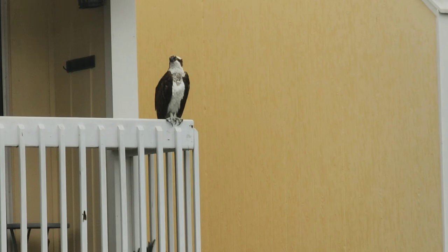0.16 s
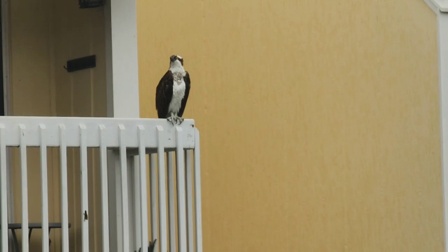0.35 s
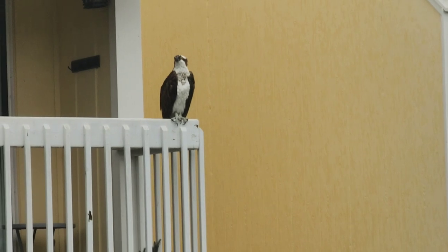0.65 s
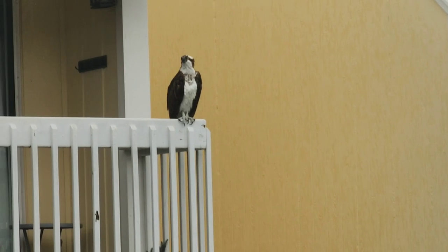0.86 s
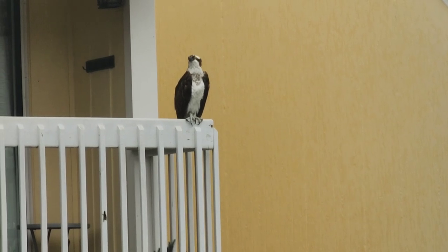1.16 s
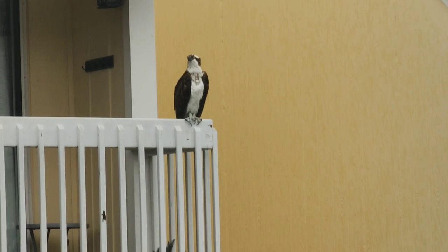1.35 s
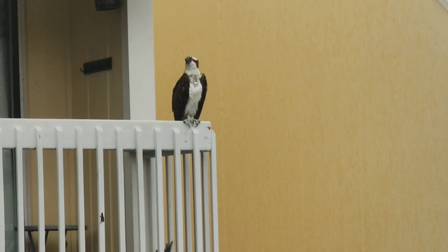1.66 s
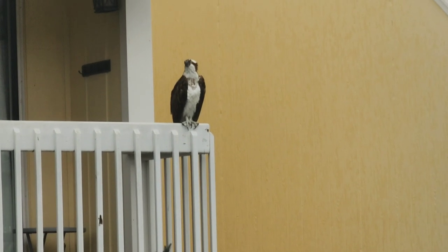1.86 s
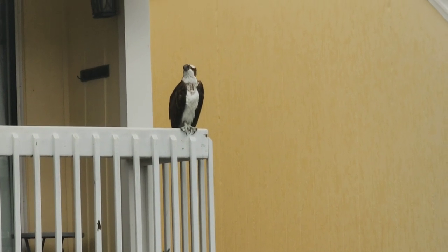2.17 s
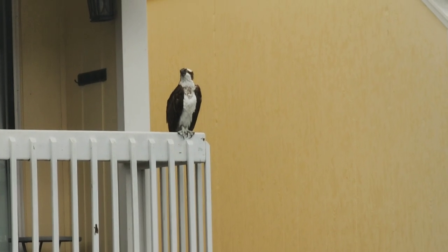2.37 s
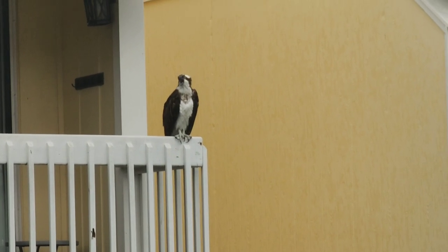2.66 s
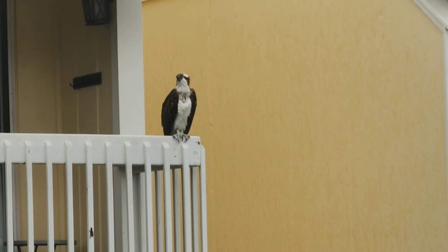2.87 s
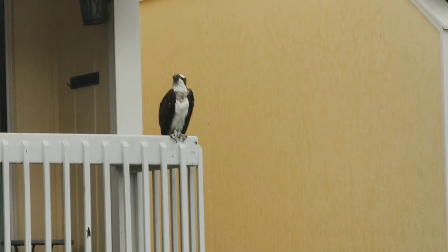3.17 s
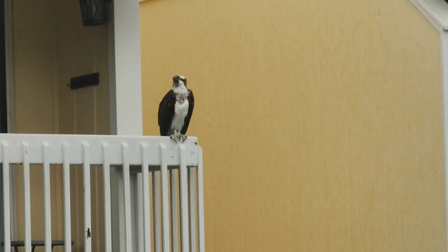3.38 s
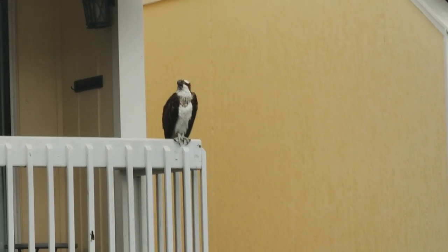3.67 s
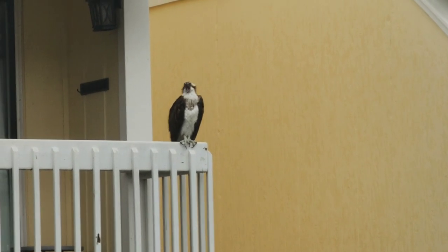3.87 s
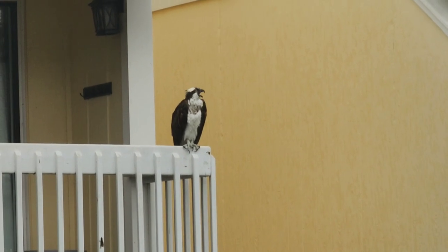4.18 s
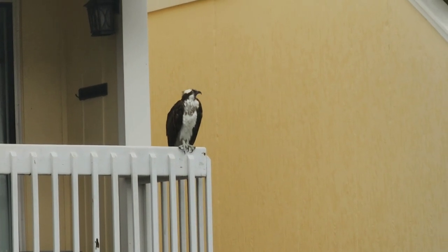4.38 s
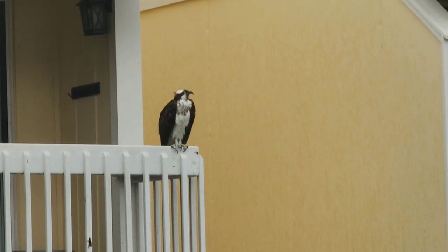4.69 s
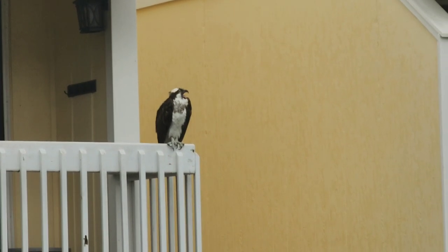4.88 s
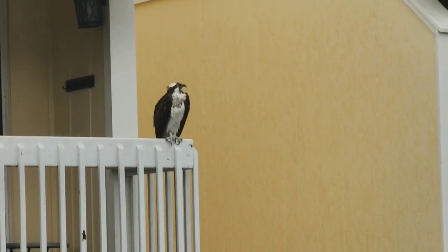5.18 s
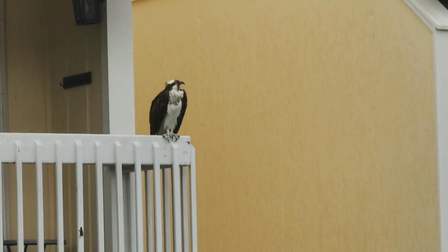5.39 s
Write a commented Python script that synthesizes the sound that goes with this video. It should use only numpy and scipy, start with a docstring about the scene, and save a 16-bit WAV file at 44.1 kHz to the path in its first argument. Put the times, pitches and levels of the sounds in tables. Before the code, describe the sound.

Outdoors among buildings, a distant low rumble and faint hiss run steadily, with a few tiny ticks close to the microphone. An osprey on a balcony rail gives three short, clear whistles, each falling in pitch, and each higher and louder than the last. It then breaks into a quicker, somewhat softer run of harsh screeches and yelps. The walls throw the calls back with a short echo.

```python
"""A far outdoor rumble and a faint hiss come first, with a few small ticks close by.
Then an osprey calls from a balcony rail: three falling whistles, each higher and louder, and a run
of harsh screeches. Air shakes thin membranes in its voice box (the syrinx), whose two sides sound
together in the screeches. The house wall and the buildings around throw the calls back."""
import sys
import numpy as np
from scipy import signal
from scipy.fft import rfft, irfft, next_fast_len
from scipy.io import wavfile
from scipy.ndimage import uniform_filter1d

SR = 44100
rng = np.random.default_rng(int(sys.argv[2]) if len(sys.argv) > 2 else 0)


def dump_mix(stems):
    """Bounce the given channels to the path in sys.argv[1] as a 16-bit WAV at rate SR."""
    frames = np.atleast_2d(stems).T  # one column per channel
    limited = np.clip(frames, -1, 1)  # hard clip at full scale
    pcm = np.round(limited * 32767).astype(np.int16)
    wavfile.write(sys.argv[1], SR, pcm)


N = 244314
TIME = np.arange(N) / SR
PROGRESS = np.linspace(0, 1, 200)  # from the start of a note to its end
NOTE_FLOOR_DB = -25  # how far a swell drops at its two ends
FFT_SIZE = 2 ** 18


def gain_of(db):
    """Turns decibels into a factor to multiply by."""
    return 10 ** (np.asarray(db) / 20)


def unit_level(x):
    """Scales a signal to an average (rms) level of 1."""
    return x / np.sqrt(np.mean(x ** 2) + 1e-20)


def look_up(points, hz):
    """Reads between the rows of a (frequency, value) table, giving each octave equal room."""
    row_hz, value = np.transpose(points)
    return np.interp(np.log(hz + 1), np.log(row_hz + 1), value)


def flutter(rate_hz):
    """Random wavering up to about the given rate."""
    hz = np.fft.rfftfreq(FFT_SIZE, 1 / SR)
    spectrum = rfft(rng.standard_normal(FFT_SIZE)) / (1 + (hz / rate_hz) ** 4)
    return unit_level(irfft(spectrum)[:N])


def blur(grid, rows, columns):
    """Smooths a grid of random numbers into patches."""
    return unit_level(uniform_filter1d(uniform_filter1d(grid, rows, axis=0), columns, axis=1))


def background(level_db=-41.5, patchy_db=1.0):
    """A far rumble, alike in both ears, under a thin, wide hiss."""
    # tone colour of the outdoor air: frequency_hz, relative_level_db
    air = [(15, -23), (40, -13.5), (75, 0), (130, -3.5), (280, -6.5), (470, -14.5), (720, -15.5),
           (1050, -22.5), (1600, -20.5), (2800, -29.5), (4300, -35), (6300, -44.5), (9000, -34.5),
           (12500, -40.5), (16000, -46.5)]
    # how alike the two ears are: frequency_hz, likeness (1 = the same, 0 = unrelated)
    ear_likeness = [(60, 1), (130, 1), (290, 0.84), (640, -0.073), (1410, -0.14), (3100, 0.093),
                    (6820, -0.11), (15000, 0.098)]
    frames, hz = N // 512 + 5, np.fft.rfftfreq(2048, 1 / SR)
    a, b, c, d, patches = rng.standard_normal((frames, len(hz), 5)).T
    alike = np.clip(look_up(ear_likeness, hz), -.985, .985)[:, None]
    left = a + 1j * b
    right = alike * left + np.sqrt(1 - alike ** 2) * (c + 1j * d)
    colour = gain_of(look_up(air, hz)[:, None] + patchy_db * blur(patches, 14, 12))
    sound = signal.istft(np.array([left, right]) * colour, nperseg=2048, noverlap=1536)[1]
    return gain_of(level_db) * unit_level(sound[:, :N])


def ticks(lean_left_db=2):
    """Each tick is a quickly dying puff of noise in one broad band."""
    # small ticks and taps: start_s, level_db, centre_hz, width_octaves, decay_s
    taps = [(.106, -46.5, 12600, 0.44, 0.014), (.597, -58, 11000, 0.64, .012),
            (.746, -44, 11000, 0.25, 0.0057), (1.024, -44, 1400, .6, 0.01), (1.29, -47, 9700, 0.31, 0.013),
            (2.165, -36, 1410, 0.34, 0.0048), (2.165, -54, 9050, 0.88, 0.01),
            (2.415, -39.5, 1180, 0.88, 0.0035), (3.74, -53, 7850, 0.97, 0.0046)]
    out, t, hz = np.zeros((2, N)), TIME[:4096], np.fft.rfftfreq(4096, 1 / SR)
    for start_s, level_db, centre_hz, width_octaves, decay_s in taps:
        band = np.exp(-.5 * (np.log2((hz + 1) / centre_hz) / width_octaves) ** 2)
        noise = unit_level(irfft(rfft(rng.standard_normal((2, len(t)))) * band))
        ear_gains = gain_of([[level_db + lean_left_db], [level_db - lean_left_db]])
        first = round(start_s * SR)
        out[:, first:first + len(t)] += ear_gains * noise * np.exp(-t / decay_s)
    return out


def note(start_s, length_s, hz, level_db, rough):
    """The course of one note, as rows of time_s, pitch_hz, level_db, roughness."""
    return np.transpose(np.broadcast_arrays(start_s + length_s * PROGRESS, hz, level_db, rough))


def swell_db(pointedness=0.71, skew=1.137):
    """The air pressure rises and falls in one arch over a note."""
    arch = np.abs(np.sin(np.pi * PROGRESS ** skew)) ** pointedness
    return 20 * np.log10(np.maximum(arch, gain_of(NOTE_FLOOR_DB)))


def whistle(start_s, length_s, leap_hz, held_hz, hold_s, sag_hz_per_s, level_db, rough, pointedness):
    """The pitch drops onto its note, holds, then sags steadily as the air runs out."""
    leap_s, bend_s = .02, .005  # the bend rounds the turn from hold to sag
    t = length_s * PROGRESS
    leap = leap_hz * np.exp(-(t / leap_s) ** 1.35)
    sag = sag_hz_per_s * bend_s * np.logaddexp(0, (t - hold_s) / bend_s)
    return note(start_s, length_s, held_hz + leap - sag, level_db + swell_db(pointedness), rough)


def syrinx(notes, jitter, rasp_db, overtone_db, shimmer=1.0, stiffening=1.0, easy_db=-28, fray=0.25):
    """A membrane whistles. Driven hard, its pitch (jitter) and level (shimmer) shake and air rasps."""
    # overtones at 2, 3 and 4 times the pitch: relative_level_db
    overtone_levels = [-21, -41, -45.5]
    wobble, throb, bursts, slip = flutter(450), flutter(350), flutter(240), flutter(400)
    air = rasp() * unit_level(gain_of(3 * bursts))
    out = np.zeros(N)
    for rows in notes:
        times, *columns = np.transpose(rows)
        span = (TIME >= times[0]) & (TIME <= times[-1])
        t = TIME[span]
        hz, level_db, rough = (np.interp(t, times, column) for column in columns)
        rough = np.clip(rough, 0, 1)  # 0 is a clean tone, 1 is all rasp
        phase = 2 * np.pi * np.cumsum(hz * (1 + jitter * rough * wobble[span])) / SR
        # overtones grow with a wide, regular swing, and fray as the membrane closes unevenly
        edge = gain_of(overtone_db + stiffening * np.maximum(level_db - easy_db, 0)) * (1 - rough ** 2)
        frayed_phase = phase + fray * np.sqrt(np.minimum(rough, .05)) * slip[span]
        overtones = sum(gain_of(db) * (k * hz < SR / 2) * np.sin(k * frayed_phase)
                        for k, db in enumerate(overtone_levels, 2))
        tone = np.sqrt(2) * (np.sin(phase) + edge * overtones) * (1 + shimmer * rough * throb[span])
        voice = np.sqrt(1 - rough ** 2) * tone + gain_of(rasp_db) * rough * air[span]
        soft_ends = np.clip(np.minimum(t - times[0], times[-1] - t) / 0.00095, 0, 1)
        out[span] += gain_of(level_db) * soft_ends * voice
    return out


def rasp(ragged_db=5):
    """Wild swings hop between short-lived tones, so the rasp is ragged in both pitch and time."""
    # rushing air, shaped by the throat and open bill: frequency_hz, relative_level_db
    colour = [(1200, -50), (2000, -13.5), (2800, -5), (3700, 2.5), (4600, -5.5), (5600, -6), (6700, -8),
              (8200, -9), (10000, -14), (12300, -19.5), (16000, -43.5)]
    hz, _, spectrum = signal.stft(rng.standard_normal(N), SR, nperseg=512, noverlap=384)
    patches = blur(rng.standard_normal(spectrum.shape), 4, 7)
    spectrum *= gain_of(look_up(colour, hz)[:, None] + ragged_db * np.minimum(patches, 2))
    return unit_level(signal.istft(spectrum, SR, nperseg=512, noverlap=384)[1][:N])


def bill(voice, treble_from_hz=6800):
    """The treble grows as the bill opens and dulls as the head turns aside."""
    # treble sent towards the listener: time_s, boost_db
    beam = [(.87, -9), (1.82, 5), (2.64, 6), (3.45, 4.5), (4.0, 8.5), (4.4, -5.5), (4.7, -2), (4.8, 5),
            (5.45, 1.5)]
    hz = np.fft.rfftfreq(FFT_SIZE, 1 / SR)
    high_pass = 1 - 1 / (1 + (hz / treble_from_hz) ** 12)
    treble = irfft(rfft(voice, FFT_SIZE) * high_pass)[:N]
    boost_db = np.interp(TIME, *np.transpose(beam))
    return voice + treble * (gain_of(boost_db) - 1)


def near_walls(voice, left_lead_s=0.000097):
    """The straight path reaches the left ear first; hard surfaces by the perch add quick echoes."""
    # echoes off the rail, floor and house wall: left_delay_s, right_delay_s, left_db, right_db
    echoes = [(.00304, 0.00174, -22.5, -15.5), (.00689, .00696, -31, -11.5), (.00807, 0.011, -6.5, -1),
              (0.0147, .01245, -29, -20.5), (0.0142, .02098, -8, -8)]
    size = next_fast_len(N + SR // 10)
    hz = np.fft.rfftfreq(size, 1 / SR)
    delayed = lambda delays_s: np.exp(-2j * np.pi * np.outer(delays_s, hz))
    paths = delayed([0, left_lead_s])
    for left_s, right_s, left_db, right_db in echoes:
        paths += gain_of([[left_db], [right_db]]) * delayed([left_s, right_s])
    return irfft(rfft(voice, size) * paths, size)[:, :N]


def yard(voice, tail_db=-11, balcony_db=-9, balcony_decay_s=0.12, far_db=1.5, far_delay_s=0.207):
    """Sound scatters off the balcony; a long tail of echoes swells as the facing buildings answer."""
    # time the echoes take to fade by 60 dB: frequency_hz, fade_s
    fade_times = [(1000, 2.4), (2500, 1.15), (4000, 1.28), (7000, 0.9), (12000, 0.47)]
    bounces = rng.standard_normal((2, SR)) * (rng.random((2, SR)) < 2000 / SR)  # about 2000 a second
    hz, t, spectrum = signal.stft(bounces, SR, nperseg=256)
    answer_db = far_db * np.exp(-((t - far_delay_s) / 0.015) ** 2)
    spectrum *= gain_of(answer_db - 60 * t / look_up(fade_times, hz)[:, None])
    tail = signal.istft(spectrum, SR, nperseg=256)[1][:, :SR]
    tail *= np.clip(TIME[:SR] / 0.024 - .5, 0, 1)  # fades in
    scatter = rng.standard_normal((2, SR)) * np.exp(-TIME[:SR] / balcony_decay_s) * (TIME[:SR] > .009)
    echoes = gain_of(tail_db) * unit_level(tail) + gain_of(balcony_db) * unit_level(scatter)
    return signal.fftconvolve(voice[None], echoes / np.sqrt(SR), axes=1)[:, :N]


def yelp(start_s, length_s, top_hz, bottom_hz, level_db, end_rough):
    """A tight membrane goes slack: the pitch plunges, fastest at first, and the tone soon breaks up."""
    hz = top_hz * (bottom_hz / top_hz) ** (PROGRESS ** .7)
    rough = end_rough * PROGRESS ** .35
    return note(start_s, length_s, hz, level_db + swell_db(pointedness=.95), rough)


def screech(start_s, length_s, glide, *sides, attack_s=0.0085, release_s=0.0079):
    """Both sides of the syrinx are blown too hard and glide together. Gives (lower, upper) notes."""
    t = length_s * PROGRESS
    ramps = np.minimum(t / attack_s, (length_s - t) / release_s)
    ramps_db = 20 * np.log10(np.clip(ramps, gain_of(NOTE_FLOOR_DB), 1))
    return [note(start_s, length_s, hz * (1 + glide * PROGRESS), db + ramps_db + rise * PROGRESS, rough)
            for hz, db, rise, rough in sides]


def clean_overtones(waver=0.0061):
    """Brief, clean overtones ring out an octave above the screeching voice."""
    # overtones of the screeches: start_s, length_s, start_hz, end_hz, level_db
    overtone_rows = [(3.414, .045, 7370, 7320, -41), (3.47, 0.043, 6560, 6800, -40.5),
                     (4.004, 0.027, 7980, 7730, -40.5), (4.026, 0.03, 7100, 6950, -39),
                     (4.763, .05, 6460, 5950, -46.5), (5.352, 0.032, 5660, 5790, -42.5),
                     (5.478, .045, 6370, 6280, -47)]
    out, wobble = np.zeros(N), flutter(150)
    for start_s, length_s, start_hz, end_hz, level_db in overtone_rows:
        span = (TIME >= start_s) & (TIME < start_s + length_s)
        hz = np.linspace(start_hz, end_hz, span.sum()) * (1 + waver * wobble[span])
        tone = np.sqrt(2) * np.sin(2 * np.pi * np.cumsum(hz) / SR)
        out[span] += gain_of(level_db) * tone * signal.windows.tukey(len(hz), .25)
    return out


def closing(start_s, length_s, start_hz, end_hz, upper_db, lower_db):
    """The pressure eases and both sides find a falling pitch again. Gives (lower, upper) notes."""
    side_ratio, lag_s, extra_sag = 1.24, .01, 0.1225  # the lower side lets go later and sinks further
    upper_hz = start_hz + (end_hz - start_hz) * PROGRESS
    lower_hz = upper_hz / side_ratio * (1 - extra_sag * PROGRESS ** 2)
    return (note(start_s + lag_s, length_s, lower_hz, lower_db + swell_db(), rough=0.53),
            note(start_s, length_s, upper_hz, upper_db + swell_db(), rough=0.26))


def osprey():
    """Whistles, yelps and two-voiced screeches leave the bill and bounce off the surroundings."""
    # clear falling whistles: start_s, length_s, leap_hz, held_hz, hold_s, sag_hz_per_s, level_db,
    # roughness, pointedness of the swell
    whistle_rows = [(0.828, 0.068, 5.7, 2136, 0.035, 6460, -26, 0.02, 1.46),
                    (1.767, 0.1, 15.7, 2486, 0.046, 9540, -22.5, 0.01, 0.83),
                    (2.558, 0.16, 3000, 3140, .054, 8390, -16.5, 0.05, 1.17)]
    # steep yelps that open the screeches: start_s, length_s, top_hz, bottom_hz, level_db, end_roughness
    yelp_rows = [(3.376, .018, 6810, 3850, -31, .35), (3.927, 0.015, 7200, 4040, -30.5, 0.14),
                 (4.328, 0.038, 6400, 2735, -30, 0.26), (4.402, .04, 5600, 2910, -31.5, 0.18),
                 (4.541, .02, 5660, 3260, -31.5, 0.5), (4.687, 0.026, 5120, 3646, -36, 0.34),
                 (5.326, 0.021, 6690, 3660, -36, 0.65)]
    # harsh held notes: start_s, length_s, glide (share of the pitch), lower_side, upper_side;
    # each side: pitch_hz, level_db, rise_db (negative fades), roughness
    screech_rows = [(3.392, .08, -.09, (3829.5, -38, 8, 0.4), (4652, -30.5, -21, .5)),
                    (3.941, 0.086, .04, (3968.5, -37.5, 2, 0.7), (4850, -30, -12, 0.4)),
                    (4.357, 0.043, -0.0058, (2847, -32.5, -11, 0.55), (3498, -41, -10, -1.5)),
                    (4.438, .108, -0.021, (3501.5, -46, -3, .85), (4061.5, -35, -8, 0.9)),
                    (4.557, .125, 0.072, (3550, -47, -2, 2.5), (4150, -38.5, -1.5, 0.6)),
                    (4.698, .08, .1, (3502, -48, -1, -0.3), (3981.5, -40.5, 2.5, 0.6)),
                    (5.338, 0.116, -.04, (3749, -41.5, -5, 0.6), (4450, -42.5, 2, 0.45)),
                    (5.439, 0.13, .11, (3399, -50.5, 9, 1), (4520, -37.5, -4, 0.5))]
    # notes into which a screech clears: start_s, length_s, start_hz, end_hz, upper_db, lower_db
    closing_rows = [(3.46, 0.071, 3370, 3232, -33.5, -46.5), (4.015, 0.0485, 3745, 3417, -32.5, -42),
                    (4.754, .097, 3255, 2860, -33, -46.5)]
    whistles = syrinx([whistle(*row) for row in whistle_rows], jitter=.04, rasp_db=-1.5,
                      overtone_db=1.5, shimmer=1.4, stiffening=0.49, easy_db=-29, fray=0.56)
    yelps = syrinx([yelp(*row) for row in yelp_rows], jitter=.05, rasp_db=-2.5,
                   overtone_db=6.5, shimmer=1.56, fray=.7)
    pairs = [screech(*row) for row in screech_rows] + [closing(*row) for row in closing_rows]
    lower_notes, upper_notes = zip(*pairs)
    lower_side = syrinx(lower_notes, jitter=0.038, rasp_db=1, overtone_db=-6)
    upper_side = syrinx(upper_notes, jitter=.033, rasp_db=.5, overtone_db=-4, shimmer=1.1)
    voice = bill(whistles + yelps + lower_side + upper_side) + clean_overtones()
    return near_walls(voice) + yard(voice)


def scene():
    """The bird over the quiet outdoors."""
    return osprey() + background() + ticks()


def record(dry, top_hz=15900):
    """Each microphone opening colours the sound in its own way; the highest treble is cut off."""
    # tone colour of the two openings: frequency_hz, left_db, right_db
    openings = [(300, -0.5, -1), (1200, 0.5, 2), (2260, 0, 3), (3200, 3, -2), (4530, 3, -0.5),
                (5500, 1, -14.5), (6360, -2.5, -22.5), (7800, -7, -22.5), (8580, -5.5, -21),
                (10120, -13, -13), (11150, -4, -5.5), (12350, 0.5, -3.5), (13400, 3, -5), (15500, 4.5, -11)]
    size = next_fast_len(N + SR // 10)
    hz = np.fft.rfftfreq(size, 1 / SR)
    colour = gain_of([look_up(np.array(openings)[:, [0, ear]], hz) for ear in (1, 2)])
    heard = irfft(rfft(dry, size) * colour, size)[:, :N]
    low_pass = signal.firwin(511, top_hz, window=("kaiser", 9), fs=SR)
    return signal.oaconvolve(heard, low_pass[None], "same", axes=1)


dry = scene()
out = record(dry)
dump_mix(out)
```